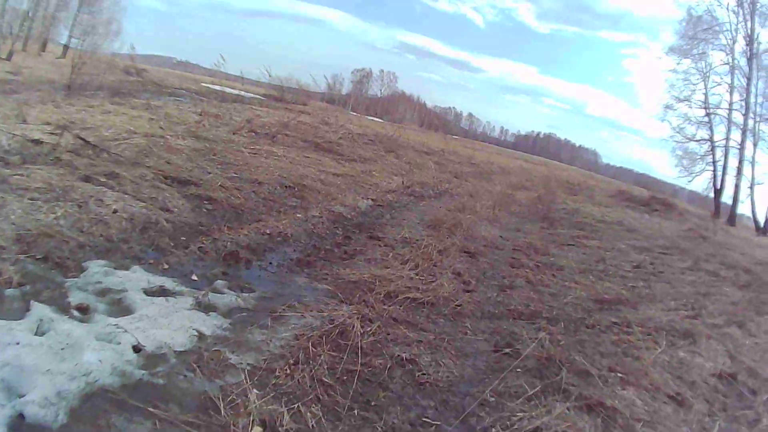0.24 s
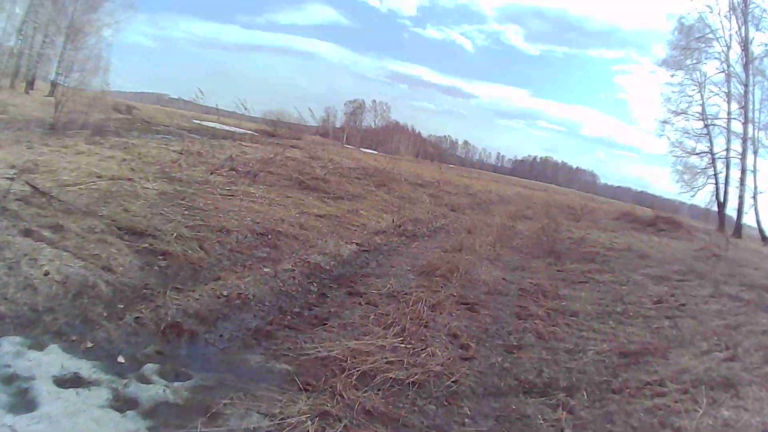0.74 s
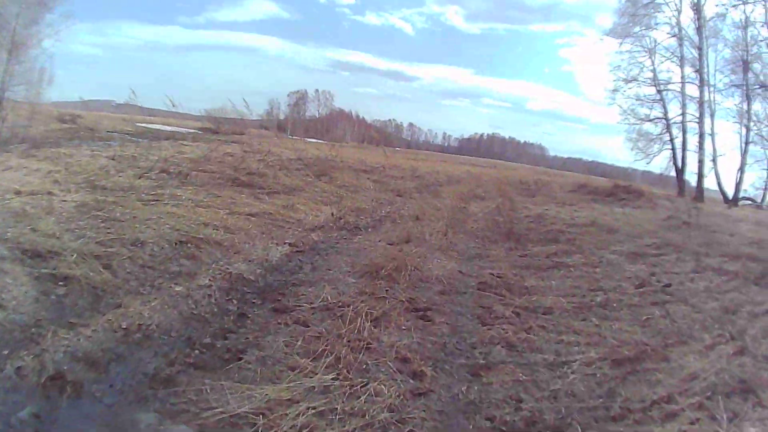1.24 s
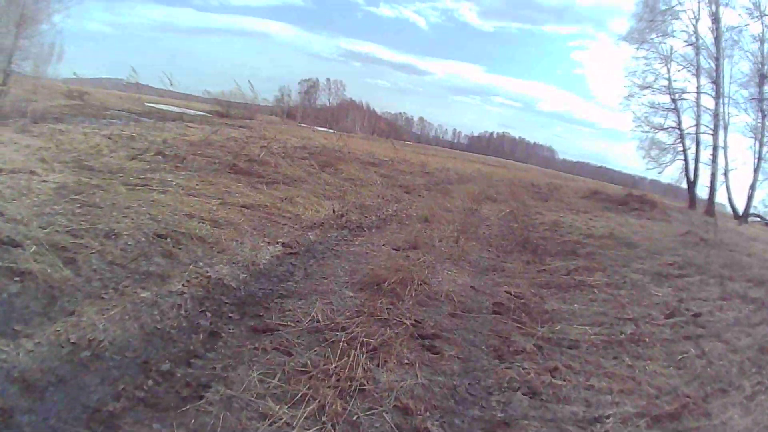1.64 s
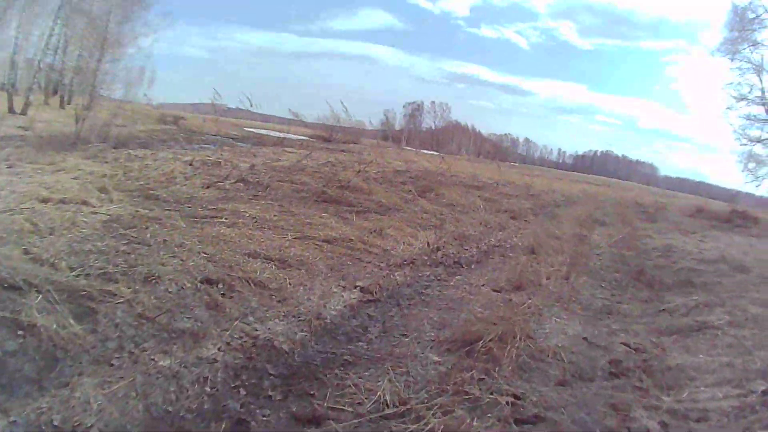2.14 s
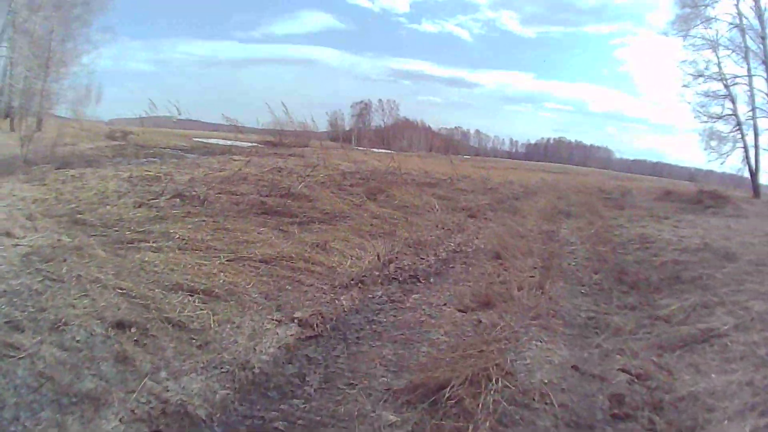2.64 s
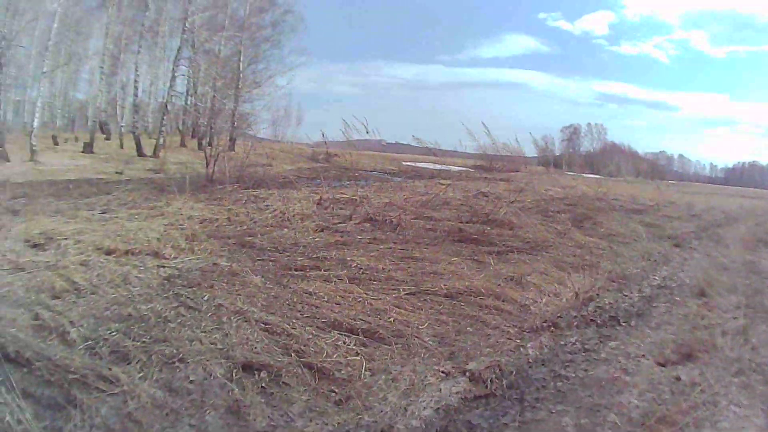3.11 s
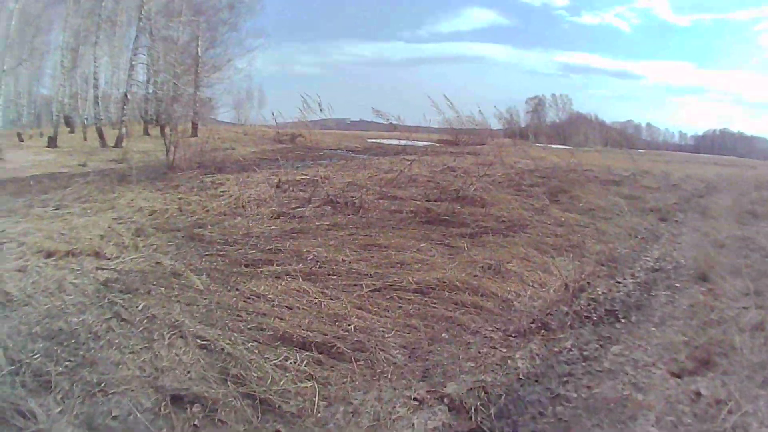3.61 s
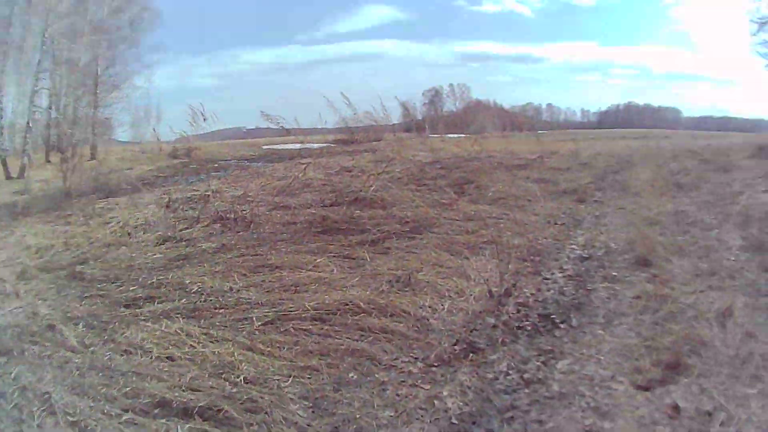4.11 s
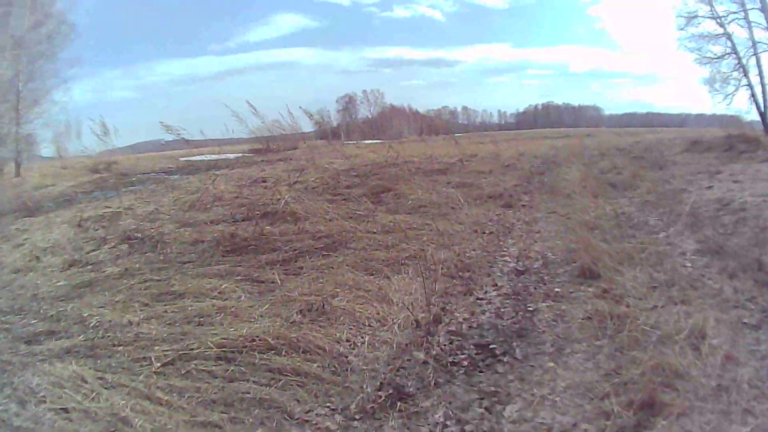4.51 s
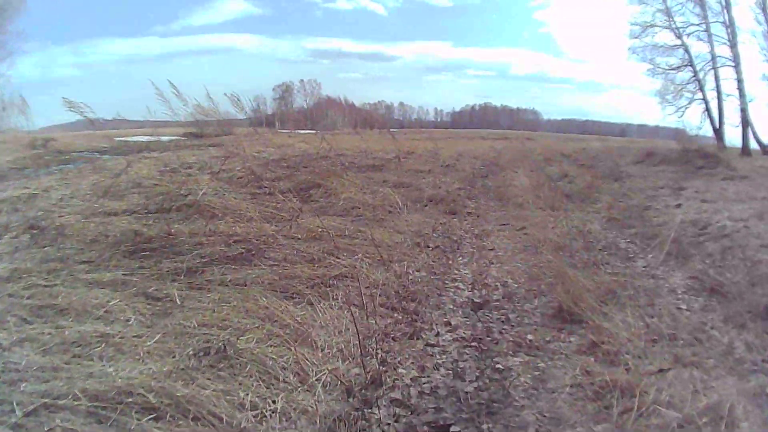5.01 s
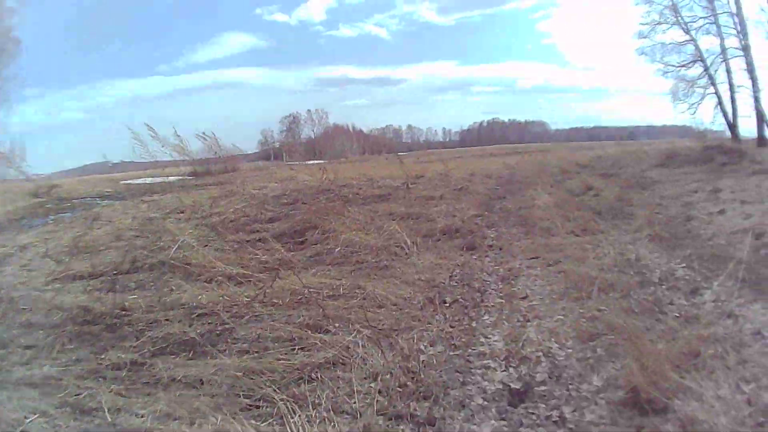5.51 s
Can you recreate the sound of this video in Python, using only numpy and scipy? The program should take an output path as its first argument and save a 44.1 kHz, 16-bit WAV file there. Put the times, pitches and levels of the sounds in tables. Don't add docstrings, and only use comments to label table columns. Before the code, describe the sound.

Raspy motorized-bicycle exhaust pops run over a bumpy dirt track, sagging midway and then speeding up, amid loose ticking metal and low wind rumble.

```python
import sys
import numpy as np
from scipy import signal
from scipy.fft import rfft, irfft, next_fast_len
from scipy.io import wavfile
from scipy.ndimage import uniform_filter1d, map_coordinates

SR = 44100
rng = np.random.default_rng(int(sys.argv[2]) if len(sys.argv) > 2 else 0)


def unload_audio(sound):
    columns = np.transpose(np.atleast_2d(sound))
    steps = np.round(np.clip(columns, -1, 1) * 32767)
    wavfile.write(sys.argv[1], SR, steps.astype(np.int16))


def how_loud(loudness_db):
    steps = np.asarray(loudness_db, float) / 20
    return 10 ** steps


N = 253575

# time in seconds, speed in turns per second.
CRANK_SPEED = [(0.0, 30.546), (0.476, 30.922), (0.494, 39.75), (0.613, 29.69), (1.247, 29.242),
               (1.9, 30.174), (2.139, 25.366), (2.35, 25.434), (2.763, 30.885), (3.104, 17.584),
               (3.499, 21.592), (3.581, 24.228), (3.976, 20.574), (4.71, 42.849), (5.146, 44.416),
               (5.158, 38.446), (5.51, 55.176), (5.75, 46.947)]
# time in seconds, pop peak in dB, exhaust brightness in dB.
ENGINE_LOAD = [(0, -44, 7), (.2, -43.5, -5), (.4, -44.5, 6.5), (.8, -39, 1.5), (1.15, -45, 8.5),
               (1.32, -42, 10), (1.5, -44.5, 6), (1.68, -38.5, -2.5), (1.95, -41, -4), (2.55, -42, 9.5),
               (2.95, -42.5, -4), (3.25, -46, -5), (3.5, -47.5, 11), (3.9, -38.5, -16), (4.22, -42.5, -9),
               (4.5, -34.5, -7.5), (5.35, -36, 5), (5.75, -36.5, 5.5)]


def unit(x):
    return x / np.sqrt(np.mean(x ** 2) + 1e-20)


def curves(rows):
    s, *columns = np.transpose(rows)
    t = np.arange(N) / SR
    return [np.interp(t, s, column) for column in columns]


def wobble(rate):
    knots = rng.standard_normal(int(N * rate / SR) + 4)
    return map_coordinates(knots, [np.arange(N) * rate / SR])


def swells(rows):
    t = np.arange(N) / SR
    return sum(np.outer(db, np.exp(-.5 * ((t - s) / spread) ** 2)) for s, spread, *db in rows)


def filtered(x, response):
    m = next_fast_len(N + SR // 2)
    return irfft(rfft(x, m) * response(np.fft.rfftfreq(m, 1 / SR)), m)[:N]


def rush(spectrum):
    f, db = np.transpose(spectrum)
    noise = rng.standard_normal(N)
    return unit(filtered(noise, lambda hz: how_loud(np.interp(np.log(hz + 1), np.log(f + 1), db))))


def ringing(x, modes):
    def response(f):
        total = 0
        for k, (hz, width, db) in enumerate(modes):
            resonance = 1j * f * width / (hz * hz - f * f + 1j * f * width)
            total = total + (-1) ** k * how_loud(db) * resonance
        return total

    impulse_peak = np.pi * sum(width * how_loud(db) for hz, width, db in modes) / SR
    return filtered(x, response) / impulse_peak


def place(times, shapes):
    at = np.round(np.asarray(times) * SR).astype(int)[:, None] + np.arange(shapes.shape[1])
    return np.bincount(at.ravel(), shapes.ravel(), N + shapes.shape[1])[:N]


def blows(times, db, shape, rough):
    puff = rough * shape * rng.standard_normal((len(times), len(shape)))
    puff[:, 0] += 1
    return place(times, how_loud(db)[:, None] * puff)


def gusts():
    # time in seconds, wind strength in dB.
    breeze = [(0, -31.5), (.2, -22), (.5, -27), (1.1, -27), (1.4, -31.5), (1.8, -34), (2.2, -29.5),
              (2.7, -27), (3.06, -35.5), (3.45, -33), (3.75, -33.5), (4, -29), (4.35, -21.5), (4.6, -21),
              (4.85, -27), (5.1, -15.5), (5.45, -25.5), (5.75, -26.5)]
    # time in seconds, spread in seconds, push in dB, flutter in dB.
    puffs = [(.2, 0.14, 5.5, 6.5), (.3, 0.049, -7, 0.5), (.37, 0.034, 5.5, 9.5), (.83, 0.033, 0.5, 9),
             (1.26, 0.032, -5, -1), (1.45, 0.037, -10.5, -2), (1.52, 0.086, 3.5, 2.5),
             (1.66, 0.061, -9, -1), (2.25, 0.045, 2, 4), (2.43, 0.055, -3.5, -1), (2.51, 0.047, 4.5, 4.5),
             (2.76, 0.038, -1, 0.5), (2.85, 0.013, -6, 2.5), (3.45, 0.03, 3.5, 5), (3.66, 0.041, -7, -4),
             (3.991, 0.035, 6.5, 9), (4.301, 0.11, -2.5, 2), (4.52, 0.078, -2, -8),
             (4.7, 0.069, -0.5, 10.5), (5.22, 0.059, -8, 1), (5.365, 0.033, 15.5, 13),
             (5.47, 0.023, -7.5, 7.5), (5.65, 0.18, -5.5, 3.5), (4.39, 0.017, -7, 7.5),
             (4.93, 0.032, 2, 11.5), (4.58, 0.026, 4, 10), (.1, 0.031, 0.5, 1.5), (.45, 0.026, 0, 0),
             (.6, 0.053, 4.5, 3), (1.12, 0.033, -1, 0), (2, .04, -0.5, 1.5), (2.62, 0.043, -2.5, -3.5),
             (3.02, 0.068, -4, 2), (3.2, 0.035, 1.5, 2.5), (3.85, 0.041, 0.5, -2), (4.12, 0.054, -1, 0.5),
             (4.82, 0.039, -1.5, 3), (5.06, 0.032, 3.5, 0.5), (5.3, 0.033, 1, 1.5)]
    strength_db, = curves(breeze)
    push_db, flutter_db = swells(puffs)
    flutter_base_db, flutter_growth = -50, 0.88
    flutter_db = flutter_base_db + flutter_growth * (strength_db + 28.5) + flutter_db
    return strength_db + push_db, flutter_db


def wind():
    # frequency in Hz, level in dB per Hz.
    push_spectrum = [(4.7, -27.5), (8.0, 6.5), (16, 0.5), (29, -2), (67, -10.5), (100, -18.5), (130, -28.5),
                     (170, -43), (290, -120)]
    # frequency in Hz, level in dB per Hz.
    flutter_spectrum = [(53, -35.5), (90, 1.5), (130, -4), (178, -6.5), (337, -17.5), (642, -25),
                        (694, -32.5), (900, -29.5), (1170, -68), (1980, -120)]
    buffet_db, flutter_db = gusts()
    eddy = wobble(33)
    push = rush(push_spectrum)
    span, evenness = round(0.09 * SR), 0.77
    power = np.abs(uniform_filter1d(uniform_filter1d(push ** 2, span), span)) + 0.0092
    push = unit(how_loud(.8 * eddy) * push / power ** (evenness / 2))
    lumps = how_loud(1.4 * eddy + 0.62 * wobble(40) + 2.36 * wobble(110))
    flutter = unit(lumps * rush(flutter_spectrum))
    return how_loud(buffet_db - 2.0) * push + how_loud(flutter_db - 0.77) * flutter


def squeak(track):
    hz, db = curves(track)
    level = how_loud(db + 3.3 * wobble(120))
    return level * np.sin(2 * np.pi * np.cumsum(hz + 40 * wobble(150)) / SR)


def ride():
    # time in seconds, frame shake in dB, grit in dB.
    shake_and_grit = [(0, -50, -70), (.15, -59.5, -72.5), (.35, -54.5, -68), (.58, -58, -71.5),
                      (.83, -56, -68.5), (1.16, -60, -72.5), (1.32, -57.5, -75), (1.45, -59, -73.5),
                      (1.9, -57, -70.5), (2.16, -62.5, -73.5), (2.39, -53, -71.5), (2.59, -59, -74.5),
                      (2.73, -50, -64.5), (2.96, -63, -72.5), (3.55, -55.5, -70.5), (3.92, -63.5, -75),
                      (4.97, -53, -67.5), (5.75, -51, -63.5)]
    # frequency in Hz, level in dB per Hz.
    wash_spectrum = [(260, -17), (450, -13), (736, -1.5), (819, -7.5), (973, -5), (1210, -2), (1520, -3),
                     (1920, 0), (2210, -11), (2380, -6), (2630, -9), (2970, -33.5), (3200, -33.5),
                     (4160, -53), (7040, -120)]
    # frequency in Hz, level in dB per Hz.
    grit_spectrum = [(1760, -44.5), (3000, -9), (3880, -6), (4380, -1.5), (5000, -8.5), (5660, -3),
                     (6240, -10.5), (7390, -12.5), (8290, -27.5), (9010, -35), (11700, -70), (19800, -120)]
    # time in seconds, spread in seconds, level in dB over the grit.
    grass = [
        (.85, .04, 6.5),
        (1.508, .012, 15),
        (1.688, 0.024, 9.5),
        (2.72, 0.074, 2),
        (4.07, 0.0047, 8),
        (4.67, 0.012, 2),
        (5.57, 0.0094, 3),
    ]
    # time in seconds, pitch in Hz, level in dB.
    saddle = [(2.255, 3480, -110), (2.27, 3560, -73), (2.3, 3660, -71), (2.34, 3570, -74),
              (2.365, 3480, -110)]
    # time in seconds, pitch in Hz, level in dB.
    tensioner = [(.29, 1344, -110), (.31, 1480, -63), (0.359, 1686, -64), (.42, 1780, -61),
                 (.48, 1720, -58), (.54, 1466, -62), (.56, 1380, -110)]
    wash_db, grit_db = curves(shake_and_grit)
    wash_lumps = how_loud(1.8 * wobble(70) + 1.5 * wobble(250))
    wash = how_loud(wash_db + .6) * unit(wash_lumps * rush(wash_spectrum))
    grit_lumps = how_loud(1.5 * wobble(90) + 2 * wobble(400))
    grit = how_loud(grit_db + swells(grass)[0] + 1.2) * unit(grit_lumps * rush(grit_spectrum))
    return wash + grit + squeak(saddle) + squeak(tensioner)


def intake():
    # frequency in Hz, level in dB per Hz.
    roar_spectrum = [(150, -60.5), (260, 0), (450, -5), (800, -17), (1500, -120)]
    roar_db = -55 + 1 * (curves(CRANK_SPEED)[0] - 46.5)
    return how_loud(roar_db) * unit(how_loud(4.6 * wobble(65)) * rush(roar_spectrum))


def fin():
    # time in seconds, peak in dB.
    pings = [(1.212, -41), (1.277, -43), (1.311, -40.5), (1.341, -38.5), (1.67, -36.5), (1.7, -39.5),
             (1.947, -38.5), (1.981, -40), (4.067, -44), (4.075, -44), (4.33, -40.5), (4.609, -44),
             (4.887, -40), (5.079, -44), (5.369, -41), (5.564, -39), (0.662, -43), (5.13, -43),
             (5.168, -46)]
    fin_hz, rise_s, t60_s = 2430, 0.00056, 0.052
    s, db = np.transpose(pings)
    t = np.arange(SR // 20) / SR
    hz = fin_hz * (1 + 0.0078 * rng.standard_normal((len(s), 1)) - 0.84 * t)
    envelope = how_loud(db[:, None] - 60 * t / t60_s) * (1 - np.exp(-(t / rise_s) ** 2))
    return place(s, envelope * np.sin(2 * np.pi * hz * t))


def pitched_knocks():
    # time in seconds, peak in dB, ring pitch in Hz.
    pitched_ruts = [(3.477, -27, 2484), (3.5085, -37, 1860), (3.513, -40, 1860), (3.526, -46, 2350),
                    (3.55, -46, 1900), (3.6116, -41, 2000), (3.627, -37, 2580), (3.6594, -33, 1780),
                    (3.6652, -37.5, 1847), (3.671, -35, 1740), (3.6915, -45, 1900)]
    rise_s, t60_s = 0.00086, 0.036
    s, db, hz = np.transpose(pitched_ruts)[..., None]
    t = np.arange(SR // 30) / SR
    steps = rng.standard_normal((len(s), len(t) // 40 + 1))
    rasp = 1 + .35 * steps.repeat(40, 1)[:, :len(t)]
    envelope = how_loud(db + 1 - 60 * t / t60_s) * (1 - np.exp(-(t / rise_s) ** 2))
    ring = envelope * rasp * np.sin(2 * np.pi * hz * t)
    tube_band = signal.butter(4, [1200, 3000], "bandpass", fs=SR, output="sos")
    return signal.sosfilt(tube_band, place(s[:, 0], ring))


def knocks():
    # time in seconds, peak in dB, hollow ring in dB, thud in dB.
    ruts = [(0.295, -40.5, -25, -10), (1.495, -41, -15, 2.5), (1.5028, -41, -4, -7),
            (2.3727, -34, -25, -23), (3.4544, -38, -7, -7), (3.477, -27, -10, -26), (3.481, -38, 7, -6.5),
            (3.523, -39, -22, -9), (3.4868, -34, -13, -8), (3.507, -48, -22, -20), (3.532, -39, -28, -32),
            (3.615, -31.5, -16, -24), (3.6429, -34.5, -11.5, -6.5), (3.655, -42, -30, -21),
            (3.665, -41, -25, -13), (3.67, -50, -25, -14), (3.5828, -34.5, -16, -17),
            (3.609, -36.5, -27, -25), (3.627, -27, -15.5, -14.5), (3.6595, -41.5, -31, -2),
            (4.063, -42, -25, -20), (4.92, -29.5, -9, -20)]
    # frequency in Hz, width in Hz, level in dB.
    tubes = [(1147, 234, 3), (1444, 130, 5.5), (1780, 200, -1.5), (2000, 90, -11.5)]
    tank = [(524, 110, -3), (880, 100, -11), (358, 84, -8.5)]
    fork = [(190.2, 22, 6.5), (300, 50, -8.5)]
    s, db, hollow_db, thud_db = np.transpose(ruts)
    jolt = how_loud(-60 * np.arange(SR // 30) / SR / .025)
    clank = ringing(blows(s, db - 5, jolt, rough=0.29), tubes)
    no_bass = signal.butter(2, 950, "highpass", fs=SR, output="sos")
    clank = signal.sosfilt(no_bass, clank)
    hollow = ringing(blows(s, db + hollow_db + 3.5, jolt, rough=0.043), tank)
    thud = ringing(blows(s, db + thud_db - 2.5, jolt, rough=0.0064), fork)
    no_treble = signal.butter(3, 2400, fs=SR, output="sos")
    return signal.sosfilt(no_treble, clank + hollow + thud)


def contacts():
    # time in seconds, peak in dB.
    hits = [(.0095, -31), (0.0169, -34.5), (0.0203, -28.5), (.0427, -35), (0.1034, -33.5), (.121, -34),
            (0.087, -42), (3.587, -36), (1.174, -51), (2.3164, -49), (1.9943, -37), (2.0083, -36.5),
            (2.3579, -38.5), (2.365, -27.5), (2.4013, -32.5), (2.415, -29), (2.801, -38), (3.5096, -36.5),
            (3.5422, -34.5), (3.5516, -28), (3.5784, -34), (3.603, -33.5), (3.6178, -27.5), (3.6291, -32),
            (3.654, -28), (4.954, -31.5), (4.967, -33.5), (5.562, -36), (5.5667, -32), (5.7164, -33),
            (0.1555, -38), (0.2032, -39), (.3387, -36), (0.6248, -39.5), (0.7236, -40.5), (1.0446, -49),
            (1.1656, -42.5), (1.7458, -42), (1.8351, -42), (1.9778, -45.5), (2.299, -40.5), (2.463, -40.5),
            (2.5817, -46.5), (2.6437, -37.5), (2.7465, -41.5), (3.356, -38.5), (3.479, -39.5), (3.734, -39),
            (4.071, -44), (4.4147, -43), (4.542, -41), (4.618, -48), (4.686, -45), (4.7289, -39.5),
            (4.764, -44.5), (5.033, -35), (5.1829, -36), (5.212, -45.5), (5.3518, -42.5), (5.51, -39),
            (4.9477, -48), (4.9812, -56), (5.0002, -47), (5.0284, -52), (5.2412, -48), (5.3703, -47),
            (5.3847, -45), (5.6423, -52), (5.6655, -63), (5.7227, -41), (2.3722, -47), (2.6526, -50),
            (2.7293, -53), (2.794, -54), (3.344, -52), (4.12, -58), (3.992, -54),
            (.0025, -32), (0.0512, -38.5), (.0697, -41.5), (0.0912, -39.5), (.1117, -42), (.3989, -46),
               (0.4117, -48), (.4201, -38.5), (.4382, -33), (0.4458, -37.5), (0.4592, -37), (0.4664, -40.5),
               (0.4766, -35.5), (.4855, -40.5), (.4981, -35), (0.5062, -40.5), (0.5184, -38.5),
               (.5274, -41), (.6613, -45.5), (0.6708, -43), (.6772, -47), (.6917, -43), (0.7276, -39.5),
               (.7383, -55), (.758, -50), (.7629, -45.5), (0.8487, -45.5), (.8647, -45), (.8755, -42),
               (.8884, -47), (1.665, -50), (1.795, -50.5), (2.08, -54), (2.1053, -45), (2.1186, -51),
               (2.2243, -43), (2.239, -46.5), (2.244, -48), (2.3828, -44), (2.3926, -40), (2.423, -45),
               (2.4278, -41), (2.684, -46.5), (2.7553, -46), (2.863, -45), (2.8803, -51.5), (2.887, -42),
               (2.8992, -42), (2.9124, -41), (3.5607, -53), (3.5671, -46), (3.5922, -49), (3.609, -36.5),
               (3.6447, -39), (3.7216, -45), (3.7473, -47), (4.8084, -41), (4.8188, -45), (4.847, -49),
               (4.8748, -48)]
    graze_count, graze_db = 45, -57
    at, soft = rng.random((graze_count, 2)).T
    grazes = [at * (N - 1) / SR, graze_db - 2 * np.log(soft)]
    struck = np.array(hits).T
    return np.concatenate([struck, grazes], axis=1)


def rattle():
    # frequency in Hz, width in Hz, level in dB.
    loose_part = [(3230, 250, -7), (4517, 374, -1), (5693, 317, -1.5), (7220, 630, -9), (7954, 1040, -15)]
    s, db = contacts()
    t = np.arange(SR // 80) / SR
    tick = ringing(blows(s, db + 5.5, how_loud(-60 * t / 0.013), rough=0.085), loose_part)
    return signal.sosfilt(signal.butter(6, 3950, "highpass", fs=SR, output="sos"), tick)


def firings():
    # start in seconds, end in seconds, change in dB.
    stutter = (4.395, 4.87, -7)
    # time in seconds, level in dB over the load.
    odd_firings = [(.215, -22), (.247, -16), (.314, -1), (.347, -9), (.533, -23), (.689, -16), (.79, -31),
                   (.824, -23), (.994, 0.5), (1.126, -10), (1.196, -2), (1.334, -20), (1.435, -13),
                   (1.503, 5), (1.536, -3), (1.73, -8), (1.809, -3), (3.381, -19), (2.081, -13),
                   (2.201, -13), (2.713, 0), (1.265, -14), (4.059, 2.5), (3.33, -21), (1.3, -11),
                   (3.78, -8), (4.999, -5), (5.045, -4), (5.134, -30), (5.674, -4.5), (4.44, -1.5),
                   (4.497, -2.5), (4.627, 5), (4.84, 1), (5.07, -7), (5.11, -11), (5.18, -1.5),
                   (5.21, -5.5), (5.257, 4), (5.386, 5), (5.467, 5), (5.52, 3.5), (5.537, -7),
                   (5.595, -1.5), (5.448, -0.5), (5.484, 0.5), (4.38, 3.5), (4.91, 0), (4.97, -3),
                   (5.023, 1.5), (5.574, 4.5)]
    # time in seconds, peak in dB.
    offbeat_pops = [(0.397, -39), (0.981, -41), (1.209, -40.5), (1.2744, -40), (1.309, -41.5), (1.34, -42.5),
                    (1.78, -50), (2.0687, -42.5), (2.3698, -35.5), (2.4134, -50), (2.802, -41.5),
                    (3.0458, -41.5), (3.371, -41), (3.477, -33.5), (3.58, -43), (3.6112, -36.5),
                    (3.6261, -31.5), (3.66, -35.5), (4.0668, -36.5), (4.3286, -38), (4.3896, -36.5),
                    (4.9672, -37), (5.055, -47), (5.3433, -29.5)]
    first_turn = .585
    uneven_db, early_late_s = 1.05, 0.00098
    turns = np.cumsum(curves(CRANK_SPEED)[0]) / SR - first_turn
    s = np.interp(np.arange(int(turns[-1]) + 1), turns, np.arange(N) / SR)
    chance = rng.standard_normal((len(s), 2))
    db = curves(ENGINE_LOAD)[0][(s * SR).astype(int)] + uneven_db * chance[:, 0]
    weak_from, weak_to = np.searchsorted(s, stutter[:2])
    db[weak_from:weak_to:2] += stutter[2]
    for at, odd_db in odd_firings:
        db[np.abs(s - at).argmin()] += odd_db
    return np.concatenate([[s + early_late_s * chance[:, 1], db], np.transpose(offbeat_pops)], axis=1)


def engine():
    # frequency in Hz, level in dB, rise in seconds, t60 in seconds.
    chambers = [(1210, -9, 0.0015, .05), (1700, -5.5, 0.002, 0.1), (1945, 1, 0.0024, 0.15),
                (2430, 3, 0.0011, 0.024), (2670, 3.5, 0.0009, 0.016)]
    # frequency in Hz, width in Hz, level in dB.
    pipe = [(1198, 18, -1), (1674, 13, -3), (2126, 25, -14.5), (2562, 76, -1.5)]
    s, db = firings()
    t = np.arange(SR // 40) / SR
    bright_db = curves(ENGINE_LOAD)[1][(s * SR).astype(int), None] + 2

    def chance():
        return rng.standard_normal((len(s), 1))

    lasts = .0066 * how_loud(.6 * chance() + .2 * np.maximum(bright_db, 0))
    gate = .13 + .87 / (1 + (t / lasts) ** 14)
    again = how_loud(-15 + 4 * chance()) * np.exp(-((t - .015) / 0.0025) ** 2)
    baffle_s = .0095 + .002 * chance()
    rebound = how_loud(-21 + 5 * chance() + bright_db) * np.exp(-((t - baffle_s) / .002) ** 2)
    long_hz = chambers[2][0]
    after = again * np.sin(2 * np.pi * long_hz * t) + rebound * np.sin(2 * np.pi * 2460 * t)
    ring = 0
    for hz, level_db, rise, t60 in chambers:
        tone = np.sin(2 * np.pi * hz * (1 + 0.015 * chance()) * t)
        scatter_db = 1.2 + 3.4 * (hz < 1500)
        size_db = level_db + scatter_db * chance() + 0.52 * bright_db * (hz > 2200)
        ring = ring + how_loud(size_db - 60 * t / t60) * (1 - np.exp(-(t / rise) ** 2)) * tone
    steps = rng.standard_normal((len(s), len(t) // 32 + 1))
    rasp = 1 + .25 * steps.repeat(32, 1)[:, :len(t)]
    pops = place(s - .0009, how_loud(db - 5.5)[:, None] * rasp * (gate * ring + after))
    gas = ringing(blows(s, db - 23, how_loud(-60 * t / .04), rough=.3), pipe)
    housing = signal.cheby2(8, 35, [600, 3150], "bandpass", fs=SR, output="sos")
    return signal.sosfilt(housing, pops + gas)


def scene():
    background = wind() + ride() + intake()
    struck = fin() + pitched_knocks() + knocks() + rattle()
    return (background + struck + engine())[None]


def low_pass(x):
    return signal.sosfilt(signal.butter(12, 9160, fs=SR, output="sos"), x)


def record(dry):
    ceiling, offset = .5, .005
    rounded = ceiling * np.tanh(dry[0] / ceiling)
    limited = filtered(rounded, lambda hz: 1 / (1 + (hz / 8700) ** 30))
    return low_pass(limited[None] + offset)


dry = scene()
out = record(dry)
unload_audio(out)
```